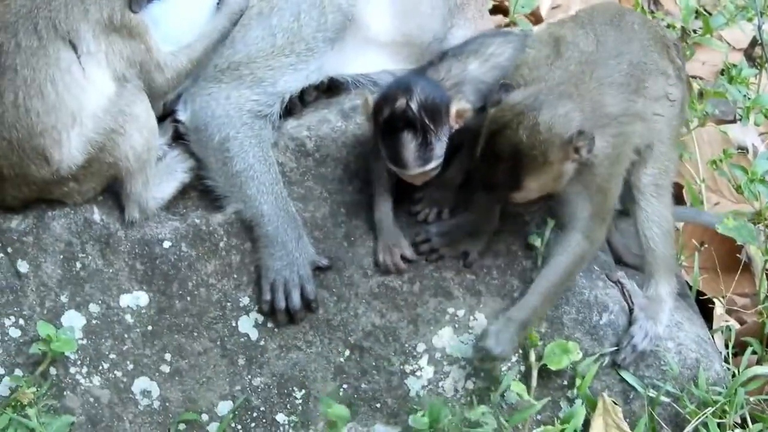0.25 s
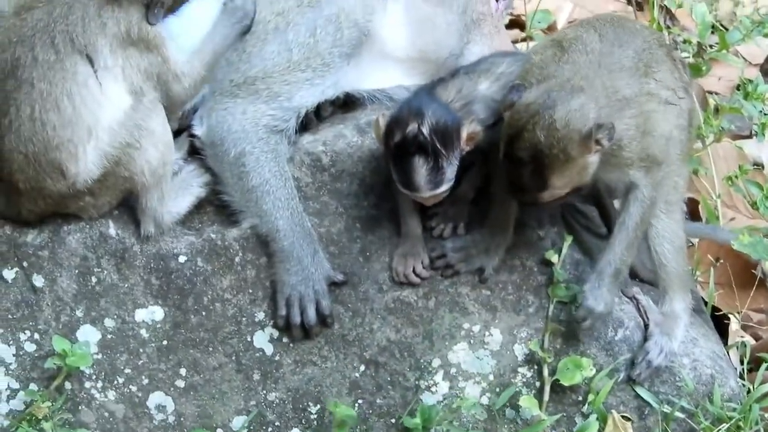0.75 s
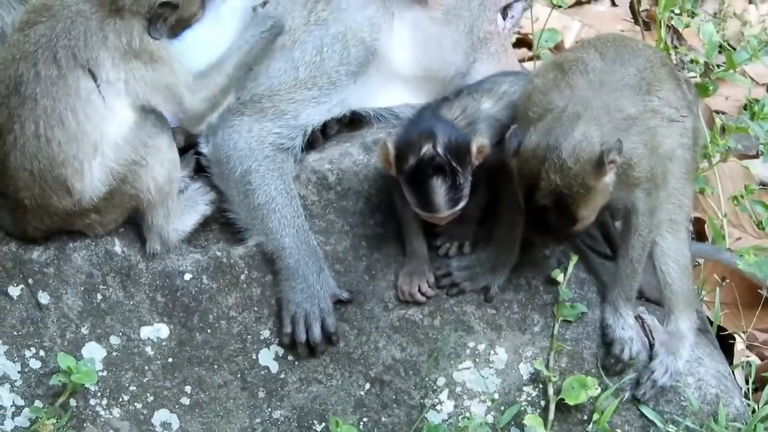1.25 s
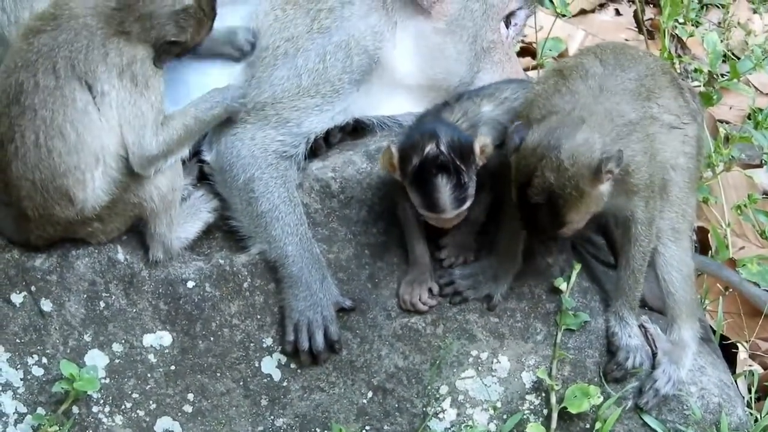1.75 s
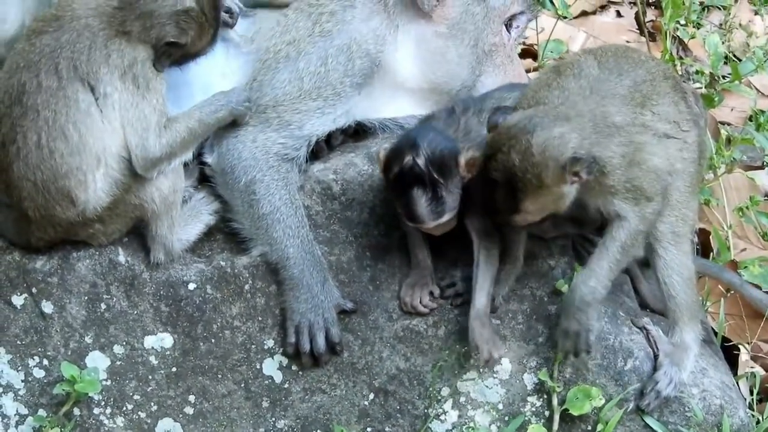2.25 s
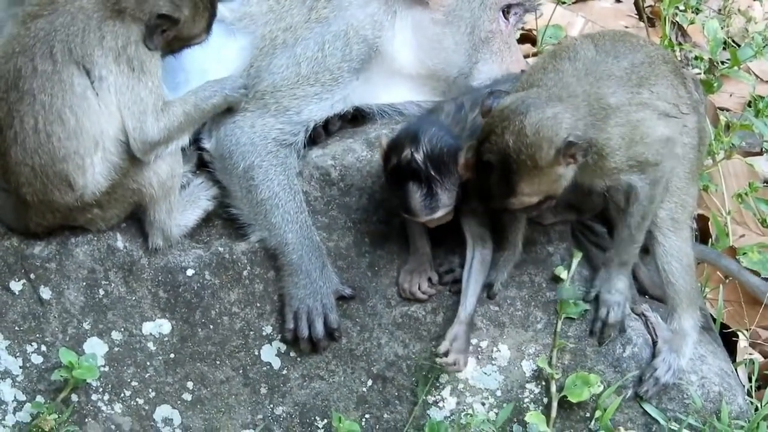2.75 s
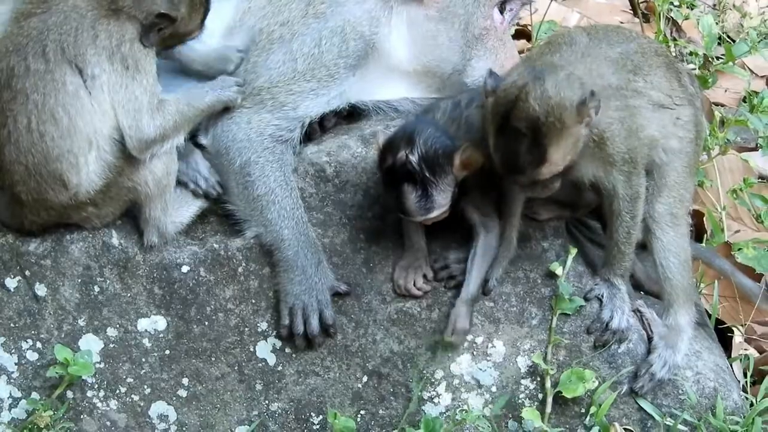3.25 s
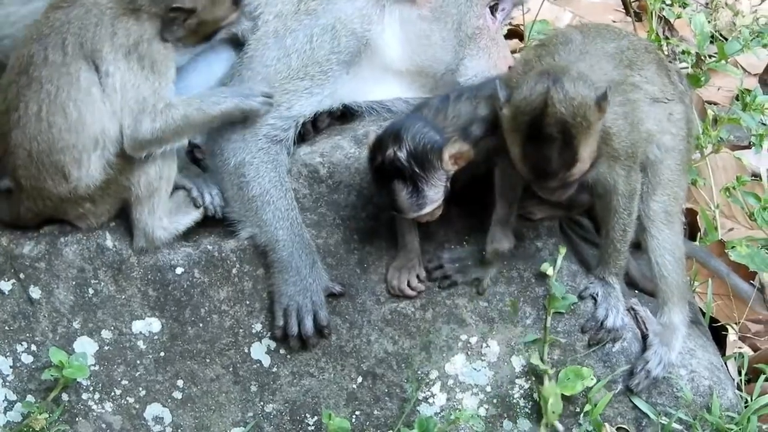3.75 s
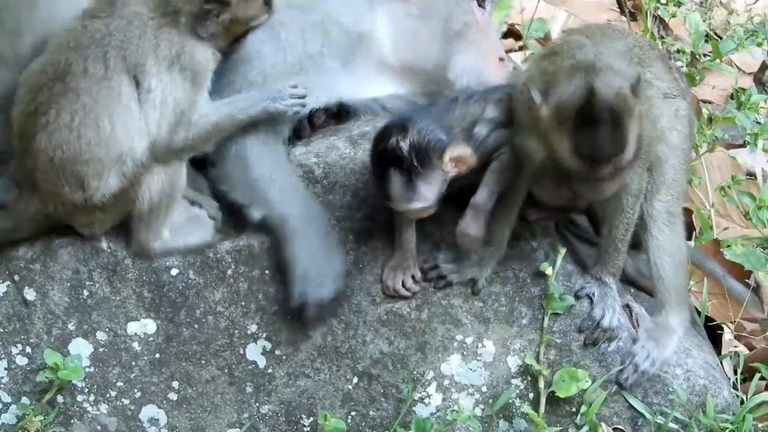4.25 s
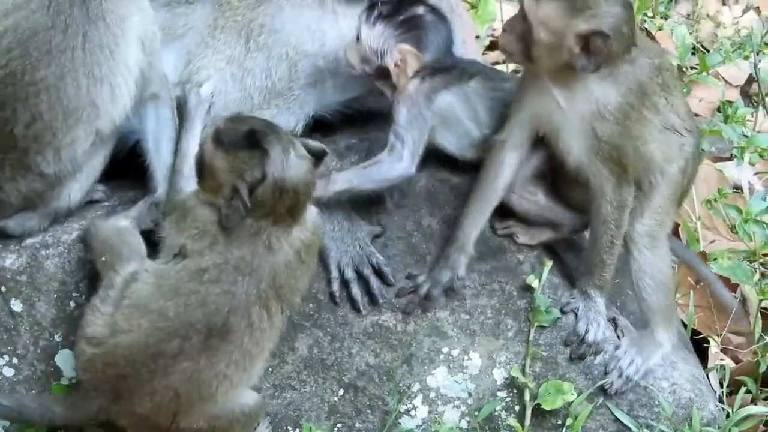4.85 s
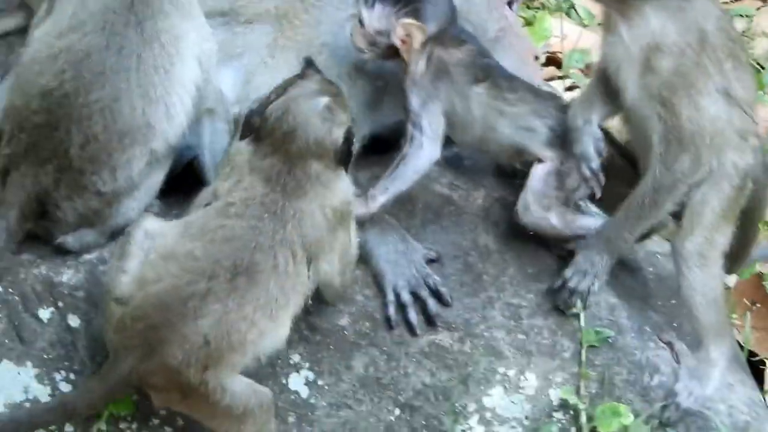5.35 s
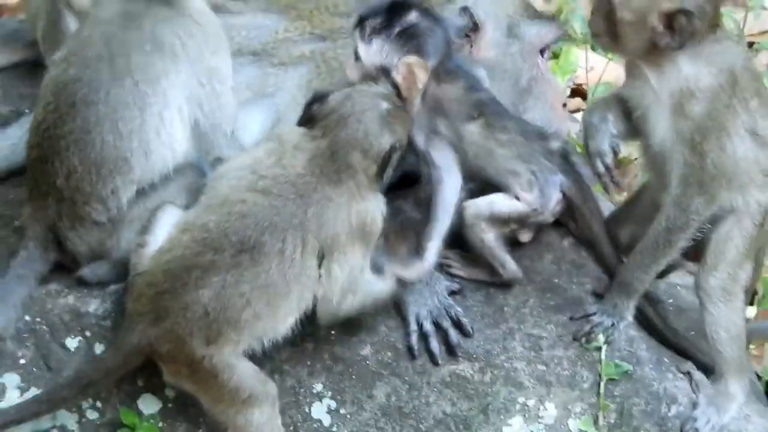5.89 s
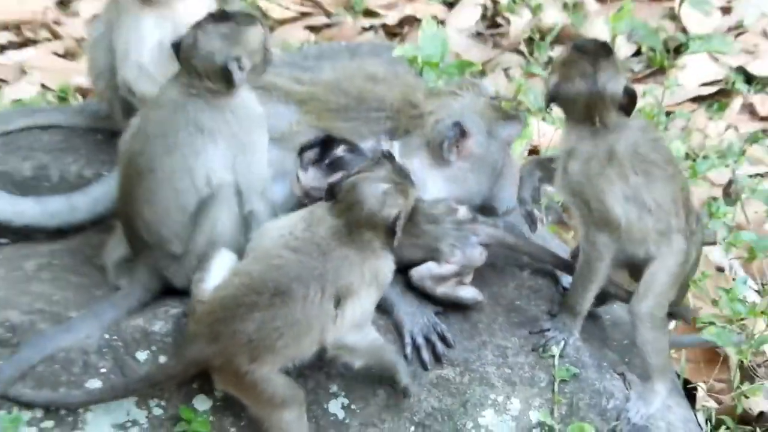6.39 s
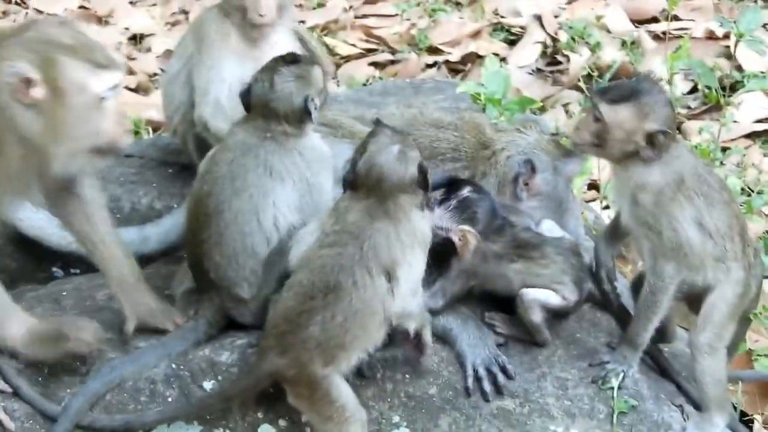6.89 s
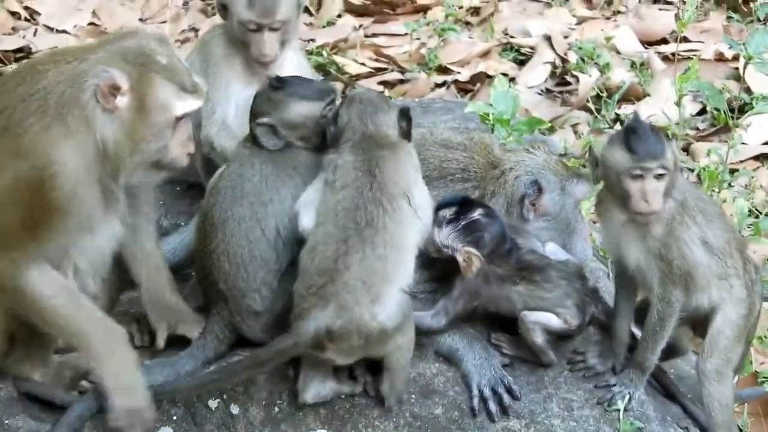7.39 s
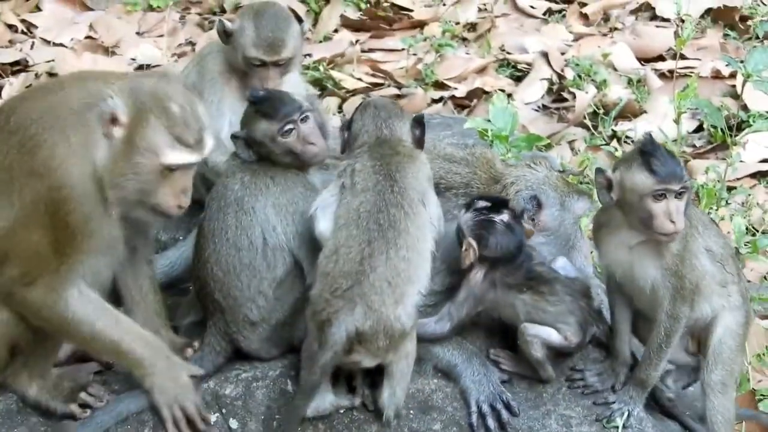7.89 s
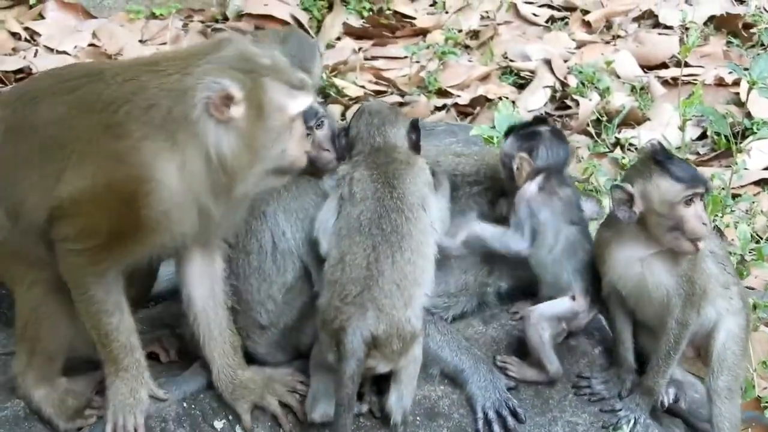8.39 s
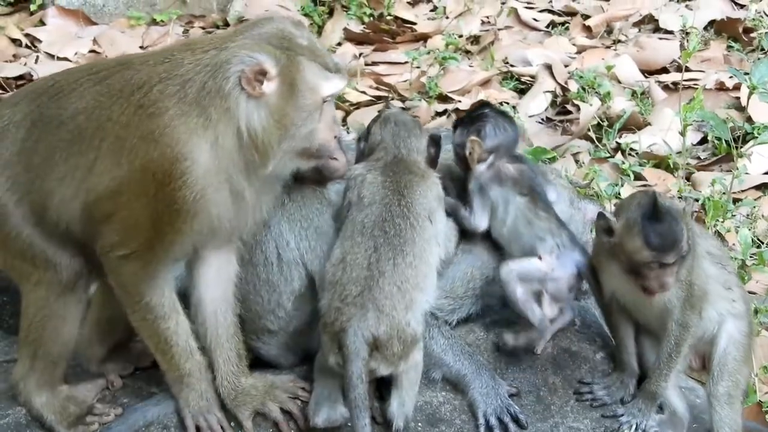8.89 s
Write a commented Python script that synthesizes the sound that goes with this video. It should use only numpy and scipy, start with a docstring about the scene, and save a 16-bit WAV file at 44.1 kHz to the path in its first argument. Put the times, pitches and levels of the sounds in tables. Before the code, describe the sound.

Cicadas drone steadily in the trees, with a few thin monkey squeals, faint rasps and brief crackles of dry leaves.

```python
"""Cicadas drone in the trees all round a close pair of microphones, by a rock with young monkeys on it.
Their tymbals click some 540 times a second and ring on every fifth overtone; the top of the drone throbs.
The monkeys shuffle in dry leaves and scuff the stone. Thin squeals, falling whistles and faint rasps
echo off the trunks. Farther back lie one shrill insect, the forest's rustle and a low outdoor rumble."""
import sys
import numpy as np
from scipy import signal
from scipy.fft import rfft, irfft, next_fast_len
from scipy.io import wavfile
from scipy.ndimage import uniform_filter1d, map_coordinates

SR = 44100
rng = np.random.default_rng(int(sys.argv[2]) if len(sys.argv) > 2 else 0)


def inscribe(sig):
    """Save sig as 16-bit PCM at rate SR to the path in sys.argv[1].

    A 1-D sig is mono; a 2-D sig holds one channel per row.
    Samples are clipped to [-1, 1] before scaling.
    """
    pcm = np.round(np.clip(np.atleast_2d(sig).T, -1, 1) * 32767)
    wavfile.write(sys.argv[1], SR, pcm.astype(np.int16))


N = 402633
TIME = np.arange(N) / SR


def amp(db):
    """Decibels as an amplitude factor."""
    return 10 ** (np.asarray(db) / 20)


def unit(x):
    """Scale to rms 1."""
    return x / np.sqrt(np.mean(x ** 2) + 1e-20)


def along(points, hz):
    """Read (frequency, value) points at hz, on a log axis."""
    point_hz, values = np.transpose(points)
    return np.interp(np.log(hz + 1), np.log(point_hz + 1), values)


def curves(rows):
    """One value per sample for each column after the time."""
    times, *columns = np.transpose(rows)
    return [np.interp(TIME, times, column) for column in columns]


def wobble(rate):
    """A smooth random curve, rate knots a second."""
    knots = rng.standard_normal(int(N * rate / SR) + 4)
    coarse_s = TIME[::32]
    return np.interp(TIME, coarse_s, map_coordinates(knots, [coarse_s * rate]))


def filtered(x, response):
    """Shape x by a gain that depends on frequency."""
    size = next_fast_len(N + SR // 4, real=True)
    return irfft(rfft(x, size) * response(np.fft.rfftfreq(size, 1 / SR)), size)[..., :N]


def add(track, sound, s):
    """Mix a sound into a track, centred on time s."""
    start = round(s * SR) - sound.shape[-1] // 2
    lo, hi = max(start, 0), min(start + sound.shape[-1], N)
    track[..., lo:hi] += sound[..., lo - start:hi - start]


def panned(x, pan_db):
    """Favour the left microphone over the right by pan_db."""
    return x * amp(np.array([pan_db, -pan_db]).reshape(2, -1) / 2)


def diffuse(pair, colour=lambda hz: 1):
    """Two unrelated sounds reach close microphones from all round: alike in the bass, apart up high."""
    # likeness of the two microphones: (frequency [Hz], correlation [ratio])
    likeness = [(60, 0.91), (200, 0.95), (370, 0.66), (1250, .7), (2700, 0.81), (5400, 0.55), (8100, 0.027),
                (12000, 0.022)]

    def mid_side_gains(hz):
        angle = np.arccos(np.clip(along(likeness, hz), -1, 1)) / 2
        return colour(hz) * np.array([np.cos(angle), np.sin(angle)])

    mid, side = filtered(pair, mid_side_gains)
    return unit(np.array([mid + side, mid - side]))


def rush(spectrum, grain_db=0, grain_rate=300, patchy_db=0):
    """Noise of rms 1 from all round, clumped into grains in time and patches in frequency."""
    grains = rng.standard_normal((2, N)) * amp(grain_db * wobble(grain_rate))
    frames = signal.stft(grains, nperseg=1024)[2]
    patches = uniform_filter1d(rng.standard_normal(frames.shape[1:]), size=5, axis=0)
    patches = uniform_filter1d(patches, size=4, axis=1)
    noise = signal.istft(frames * amp(patchy_db * unit(patches)), nperseg=1024)[1][:, :N]
    return diffuse(noise, lambda hz: amp(along(spectrum, hz)))


def band_noise(centre_hz, width_hz):
    """One second of noise in a broad resonance with dark bass."""
    hz = np.fft.rfftfreq(SR, 1 / SR) + 1
    detuning = (hz - centre_hz ** 2 / hz) / width_hz
    return unit(irfft(rfft(rng.standard_normal(SR)) / (1 + detuning ** 2 / 2), SR))


def tree_echo(x):
    """Scatter from trunks and leaves, a tail for each microphone."""
    # reverberation among the trees: (frequency [Hz], time to fall 60 dB [s])
    decay_times = [(200, 0.17), (2000, 1.08), (5000, 2), (11000, 0.072)]
    hz, t, frames = signal.stft(rng.standard_normal((2, SR)), SR, nperseg=256)
    decay = amp(-60 * t / along(decay_times, hz)[:, None])
    tail = signal.istft(frames * decay, SR, nperseg=256)[1]
    return signal.fftconvolve(np.atleast_2d(x), tail / np.linalg.norm(tail[0]), axes=1)[:, :N]


def forest_air():
    """The bed of the place: low outdoor rumble and the soft, patchy rustle of the forest."""
    # spectra of rumble and rustle: (frequency [Hz], relative level [dB])
    rumble_spectrum = [(20, -33), (45, -4.5), (90, 1), (165, 0.5), (230, -9.5), (400, -14.5), (900, -28.5)]
    rustle_spectrum = [(200, -21), (450, -14.5), (750, -3.5), (1250, 0), (1800, -2), (3000, -10),
                       (4000, -4), (10000, -2), (12500, -46)]
    # their rise and fall: (time [s], relative level [dB])
    rumble_swell = [(0.0, -65.5), (0.84, -72), (0.89, -57), (1.09, -65.5), (1.45, -53.5), (1.8, -69.5),
                    (2.34, -54), (2.52, -65), (3.2, -55.5), (3.38, -63.5), (4.02, -65.5), (4.17, -54.5),
                    (4.22, -63.5), (6.48, -65.5), (6.97, -58.5), (7.37, -63), (8.44, -61), (9.13, -65.5)]
    rustle_swell = [(0, -63), (1.0, -59), (1.5, -56), (2.25, -55), (3.3, -58), (3.8, -61), (4.4, -56),
                    (4.9, -63), (6.8, -59.5), (7.3, -63.5), (7.9, -55.5), (8.3, -62), (9.13, -59)]
    (rumble_db,), (rustle_db,) = curves(rumble_swell), curves(rustle_swell)
    rustle = panned(rush(rustle_spectrum, grain_db=1.87, grain_rate=57, patchy_db=4), pan_db=-0.6)
    rumble = amp(rumble_db + 1.36 + 0.44 * wobble(16)) * rush(rumble_spectrum)
    return rumble + amp(rustle_db + 6) * rustle


def far_insect():
    """A farther insect holds a thin, wavering note behind the drone."""
    # its narrow band: (frequency [Hz], relative level [dB])
    shrill_spectrum = [(3900, -60), (4130, -9), (4240, 14), (4330, 1), (4480, -38), (4700, -58)]
    return amp(-62 + 1.5 * wobble(5)) * rush(shrill_spectrum, grain_db=5, grain_rate=60)


def rasps():
    """Hoarse, grainy rasps left of centre, most of them sliding, half lost in their echo."""
    # (time [s], relative level [dB], centre [Hz], width [Hz], half length [s], slide [Hz/s])
    rasp_events = [(0.216, -53, 2200, 250, 0.091, -2500), (3.186, -52, 3670, 553, 0.12, -2800),
                   (3.463, -54, 1880, 450, 0.042, -2000), (3.606, -58, 1560, 220, 0.028, -1500),
                   (4.198, -53, 3440, 297, 0.038, 0), (7.589, -58.5, 1720, 600, 0.06, 0),
                   (7.823, -51.5, 1550, 350, 0.037, 3023), (7.853, -54.5, 3420, 600, 0.023, 4000),
                   (7.895, -55, 1130, 300, 0.017, 0), (8.125, -56.5, 1540, 776, 0.048, 0),
                   (8.123, -52.5, 3300, 700, 0.03, 8), (8.569, -60.5, 1640, 200, 0.097, -600),
                   (8.563, -55, 3380, 350, 0.067, -600), (9.107, -54, 2320, 350, 0.04, -3000)]
    track, t = np.zeros(N), np.arange(SR) / SR - .5
    for s, db, hz, width_hz, half_s, slide in rasp_events:
        band = signal.hilbert(band_noise(hz, width_hz))
        sliding = np.real(band * np.exp(1j * np.pi * slide * t ** 2))
        add(track, amp(db) * sliding * np.exp(-(t / half_s) ** 2 / 2), s)
    track *= unit(amp(wobble(220)))  # hoarse grain
    return amp(3) * panned(track, pan_db=6.5) + amp(-3) * tree_echo(track)


def glide(contour, partials, lead, waver, rough_db=3):
    """A voiced call, unsteady in pitch and level, whose partial number lead follows the contour."""
    hz, db = curves(contour)
    phase = 2 * np.pi * np.cumsum(hz / lead * (1 + waver * wobble(420))) / SR
    sounding = (TIME >= contour[0][0]) & (TIME <= contour[-1][0])
    gate = uniform_filter1d(1.0 * sounding, size=400)
    voice = sum(amp(level) * np.sin(round(k) * phase) for k, level in partials)
    return gate * amp(db + rough_db * wobble(260)) * voice


def calls():
    """Thin squeals and falling whistles right of centre, answered by the trees."""
    # course of the strongest partial, a list per call: (time [s], pitch [Hz], relative level [dB])
    squeal_contours = [
        [(0, 3640, -38), (.04, 3640, -36), (.08, 3700, -40), (.115, 3550, -34), (.145, 3300, -59)],
        [(3.89, 3200, -45), (3.925, 3340, -32), (3.95, 3720, -29), (4.0, 3600, -26), (4.05, 3640, -30),
         (4.095, 3600, -34), (4.13, 3300, -40)],
    ]
    whistle_contours = [
        [(.15, 2350, -62), (.19, 2190, -59), (.25, 2050, -48), (.3, 2038, -47), (.44, 2019, -44.5),
         (.47, 2015, -58)],
        [(9.04, 2600, -62), (9.07, 2400, -56), (9.1, 2160, -51), (9.13, 2110, -39)],
    ]
    # timbre of a squeal: (harmonic [number], relative level [dB])
    squeal_partials = [(2, -25), (3, -22), (4, -5.5), (5, -25), (7, -16), (10, -21)]
    squeals = sum(glide(contour, squeal_partials, lead=4, waver=0.012) for contour in squeal_contours)
    whistles = sum(glide(contour, [(1, 0)], lead=1, waver=0.005) for contour in whistle_contours)
    voices = squeals + whistles
    return amp(0.5) * panned(voices, pan_db=-4.5) + amp(-11) * tree_echo(voices)


def dry_leaves():
    """Dry leaves crackle in dense grains under the monkeys: each stir rises, holds and settles."""
    # stirs of the leaves: (start [s], hold [s], crisp level [dB], crunch level [dB])
    stirs = [(0.895, .015, -38, -49), (3.64, .04, -33.5, -48.5), (3.8, 0.032, -34, -48),
             (3.976, 0.15, -65, -39.5), (4.165, 0.052, -40, -50), (4.84, 0.083, -42, -62)]
    # spectra of the high crispness and the broad crunch: (frequency [Hz], relative level [dB])
    crisp_spectrum = [(5000, -44.5), (7500, 2), (9000, 6), (9800, 2.5), (10700, -24), (12500, -34),
                      (14000, -45)]
    crunch_spectrum = [(800, -14), (3500, -7), (4700, -0.5), (6500, 3.5), (9000, -3), (11500, -3.5),
                       (13500, -20)]
    rise_s, fall_s = 0.041, 0.079
    crisp_gain = crunch_gain = amp(-75)  # faint crackle between the stirs
    for s, hold_s, crisp_db, crunch_db in stirs:
        stir = np.exp(np.minimum(TIME - s, 0) / rise_s - np.maximum(TIME - s - hold_s, 0) / fall_s)
        crisp_gain = crisp_gain + amp(crisp_db) * stir
        crunch_gain = crunch_gain + amp(crunch_db) * stir
    crisp = crisp_gain * rush(crisp_spectrum, grain_db=-0.5, grain_rate=600)
    crunch = crunch_gain * rush(crunch_spectrum, grain_db=4, grain_rate=320)
    return crisp + crunch


def scuffs():
    """On the rock, hands and feet catch on stone and twigs: a quick rise and a short decay."""
    # (time [s], level [dB], centre [Hz], width [Hz], decay [s], left over right [dB])
    contacts = [(0.431, -44, 1130, 1150, 0.006, 9), (.879, -30.5, 1500, 590, 0.0041, 5),
                (.88, -44.5, 716, 200, 0.0049, 20.5), (.889, -31.5, 9500, 800, .003, -10),
                (0.889, -33.5, 4650, 600, .005, 4), (4.126, -42.5, 995, 700, 0.016, 2),
                (4.16, -35.5, 1040, 400, 0.012, 4.5), (4.165, -38.5, 3040, 2200, 0.017, -1),
                (4.177, -36, 9000, 1000, 0.055, 3), (5.832, -41, 1930, 600, 0.0036, -3),
                (5.841, -39.5, 4430, 800, 0.0059, 6)]
    track, t = np.zeros((2, N)), np.arange(SR) / SR - .5
    for s, db, hz, width_hz, decay_s, pan_db in contacts:
        envelope = np.exp(-np.abs(t) / decay_s * np.where(t < 0, 1.5, 1))
        add(track, panned(amp(db) * band_noise(hz, width_hz) * envelope, pan_db), s)
    return track + amp(-6) * tree_echo(track)


def flutter(depth_db, rate=18, span_s=0.43):
    """Quick chance swells and dips in dB that even out over span_s."""
    swells = wobble(rate)
    return depth_db * unit(swells - uniform_filter1d(swells, int(span_s * SR)))


def throb(first_crest_s=0.17):
    """The pulse of the drone's top, from -1 to 1, nearly three a second; it quickens halfway."""
    # pace of the throb: (time [s], period [s])
    pace = [(0, .359), (4.5, .359), (5, .341), (9.13, .343)]
    period_s, = curves(pace)
    beats = np.cumsum(1 / period_s) / SR
    return np.cos(2 * np.pi * (beats - np.interp(first_crest_s, TIME, beats)))


def ring_levels():
    """Relative dB of the three rings: all drift and flutter, the low one surges, the top one throbs."""
    # slow drift of the low and middle rings: (time [s], level [dB])
    low_swell = [(0, -43.5), (.7, -39.5), (.95, -50), (1.3, -40.5), (1.75, -40), (2.7, -48.5),
                 (3.25, -41.5), (3.95, -42), (4.35, -47), (5.6, -44), (6.2, -49), (6.65, -47.5),
                 (7.6, -42.5), (8.0, -52.5), (8.25, -47.5), (9.13, -46.5)]
    middle_swell = [(0.0, -36.5), (0.25, -39.5), (0.4, -32.5), (0.8, -38), (1.0, -32.5), (1.45, -40),
                    (2.2, -34.0), (2.44, -38.5), (2.59, -32.5), (3.09, -39.5), (3.49, -34), (4.04, -39.5),
                    (5.84, -35), (7.08, -41), (7.23, -35.5), (8.63, -40.5), (8.78, -35), (9.13, -39.5)]
    # slow drift of the top ring: (time [s], mean level [dB], throb depth [dB])
    top_swell = [(0, -41, 3), (1.6, -37.5, 2), (3.4, -37.5, 0.9), (4.6, -42.5, 3), (5.3, -41, 3),
                 (6.4, -42, 3.5), (6.9, -42, 7), (7.7, -41, 5.5), (9.13, -43, 6.5)]
    # brief surges of the low ring: (time [s], peak level [dB])
    surges = [(.19, -32.5), (1.22, -32), (1.53, -29), (1.76, -34), (2.22, -36.5), (2.57, -36.5),
              (2.97, -34.5), (3.6, -33), (4.021, -29), (4.84, -34), (5.43, -35.5), (5.97, -34),
              (7.0, -31.5), (8.372, -30.5), (8.54, -32.5), (9.05, -35)]
    surge_half_s = 0.025
    (low_db,), (middle_db,) = curves(low_swell), curves(middle_swell)
    top_db, throb_db = curves(top_swell)
    surge = sum(amp(db) * np.exp(-((TIME - s) / surge_half_s) ** 2 / 2) for s, db in surges)
    low_gain = np.hypot(amp(low_db + flutter(depth_db=3.5)), surge)
    return (20 * np.log10(low_gain),
            middle_db + flutter(depth_db=2.5),
            top_db + throb_db * throb() + flutter(depth_db=1.5))


def tymbal_cycles(click_hz, spread, drift, jitter, insects=4):
    """Each insect's place in its click cycle, 0 to 1: own rate, slow drift, fast jitter."""
    offsets = spread * np.linspace(-1, 1, insects)
    rates_hz = [click_hz * (1 + offset + drift * wobble(14) + jitter * wobble(130)) for offset in offsets]
    return [np.cumsum(hz) / SR % 1 for hz in rates_hz]


def body_ring(cycles, overtones, even_s):
    """One body resonance of the insects, smeared by the trees: levelled over even_s, with fast beats."""
    phase = 2 * np.pi * np.arange(4096) / 4096
    wave = sum(amp(db) * np.sin(round(k) * phase) for k, db in overtones)
    insects = sum(wave[(cycle * len(wave)).astype(int)] for cycle in cycles)
    chorus = diffuse(tree_echo(insects))
    power = uniform_filter1d(np.mean(chorus ** 2, axis=0), int(even_s * SR))
    return chorus / np.sqrt(np.abs(power) + 0.00092)


def cicadas():
    """In the trees all round, tymbals drive three rings; uneven clicks add side tones, buzz and sizzle."""
    # click overtones in each ring and the weak side tones: (harmonic [number], relative level [dB])
    low_tones = [(5, 5)]
    middle_tones = [(10, 2.5)]
    top_tones = [(14, -21.5), (15, -0.5), (16, -18), (17, -22.5), (18, -35), (19, -24.5), (20, -10)]
    side_tones = [(4, -10.5), (6, -6.5), (9, 0), (11, 6), (12, 4), (13, 1.5), (14, -3.5), (16, 10.5),
                  (22, 0.5)]
    # spectra of the buzz and of the sizzle round the top ring: (frequency [Hz], relative level [dB])
    buzz_spectrum = [(1900, -55), (2300, -13), (2650, 2.5), (2900, -4.5), (3500, -30.5), (4000, -20.5),
                     (4550, -56.5), (5250, 11), (5700, 0), (6300, -16.5), (7300, -12), (9000, -26),
                     (11000, -44), (12600, -67)]
    sizzle_spectrum = [(6500, -37), (7300, -16), (7850, 1), (8430, 1), (8850, -9), (9500, -8.5),
                       (10100, -14.5), (10600, -6.5), (11300, -15), (11700, -21), (12600, -32.5)]
    slower_hz, faster_hz = 542.7, 544.1
    low_db, middle_db, top_db = ring_levels()
    slower = tymbal_cycles(slower_hz, spread=.001, drift=.0035, jitter=.0045)
    faster = tymbal_cycles(faster_hz, spread=.001, drift=.0025, jitter=.0044)
    ragged = tymbal_cycles(faster_hz, spread=.002, drift=.004, jitter=.007)
    low = amp(low_db - 0.5) * panned(body_ring(slower, low_tones, even_s=0.089), pan_db=3.5)
    middle = amp(middle_db + 0.96) * body_ring(faster, middle_tones, even_s=0.086)
    middle = panned(middle, pan_db=1.4 + 1.5 * wobble(8))  # wanders between the microphones
    top = amp(top_db + 5) * panned(body_ring(slower, top_tones, even_s=0.096), pan_db=0.1)
    effort_db = 0.26 * top_db + 0.44 * middle_db
    sides = amp(effort_db - 23) * panned(body_ring(ragged, side_tones, even_s=0.082), pan_db=5)
    buzz = amp(effort_db - 19.5) * panned(rush(buzz_spectrum, grain_db=3, patchy_db=4), pan_db=3.5)
    sizzle = amp(0.92 * top_db - 11.5) * rush(sizzle_spectrum, grain_db=6.5, patchy_db=7)
    return low + middle + top + sides + buzz + sizzle


def scene():
    """All that reaches the microphones by the rock."""
    return cicadas() + far_insect() + calls() + rasps() + scuffs() + dry_leaves() + forest_air()


def record(dry):
    """The camera keeps nothing above its band limit."""
    limit_hz = 13800
    return filtered(dry, lambda hz: hz < limit_hz)


dry = scene()
out = record(dry)
inscribe(out)
```